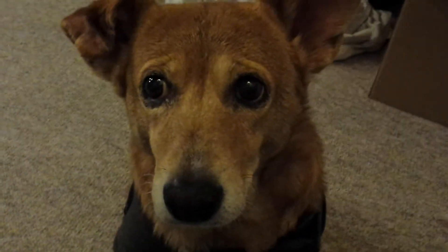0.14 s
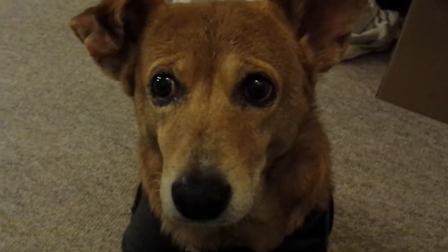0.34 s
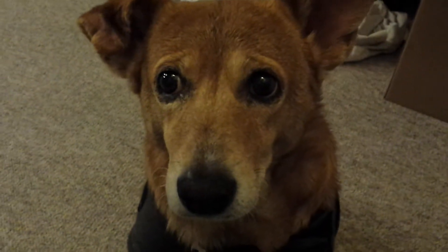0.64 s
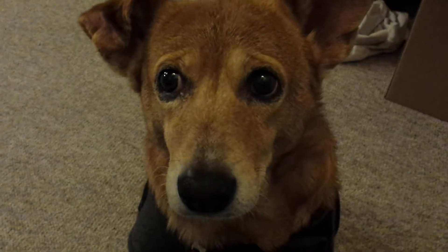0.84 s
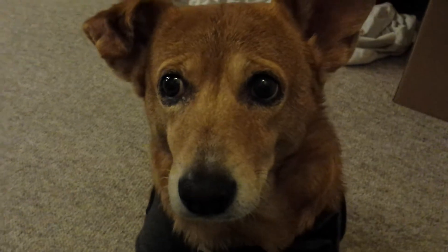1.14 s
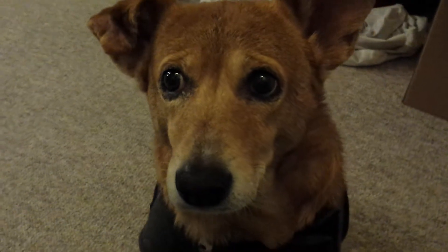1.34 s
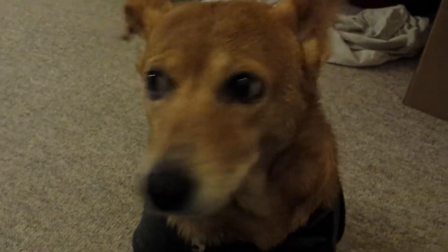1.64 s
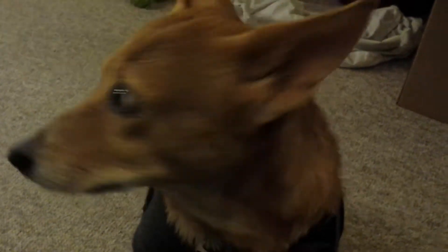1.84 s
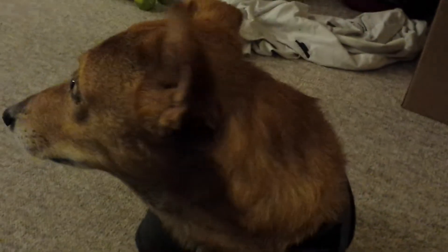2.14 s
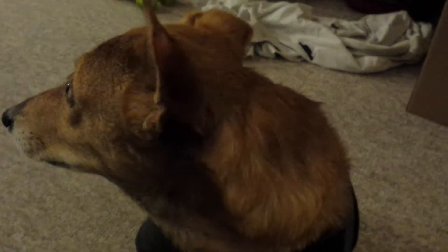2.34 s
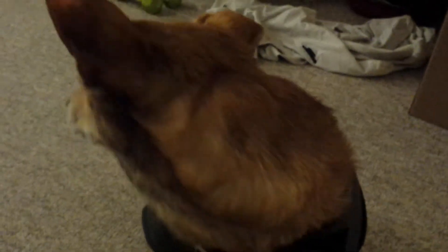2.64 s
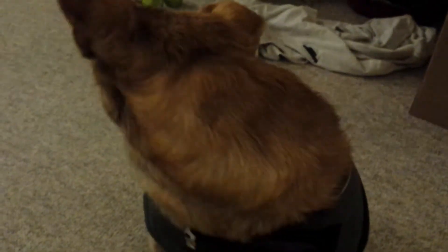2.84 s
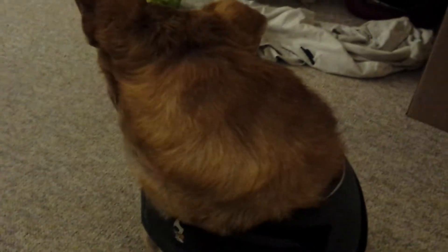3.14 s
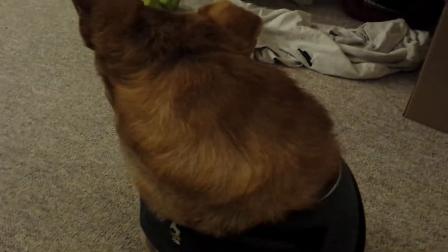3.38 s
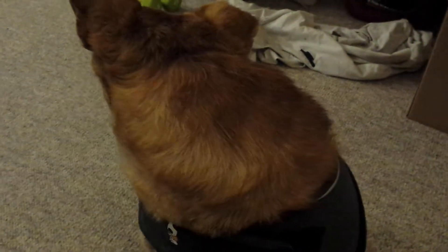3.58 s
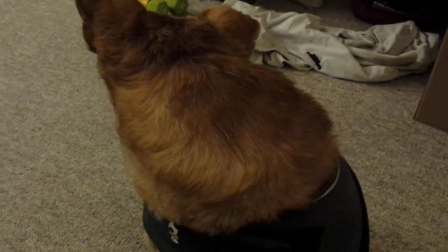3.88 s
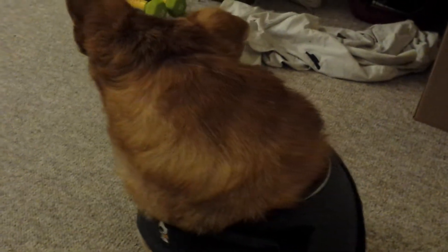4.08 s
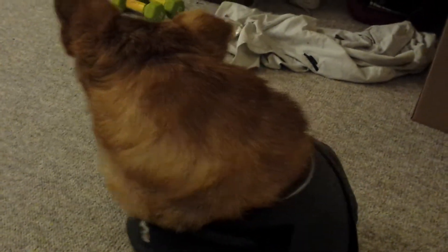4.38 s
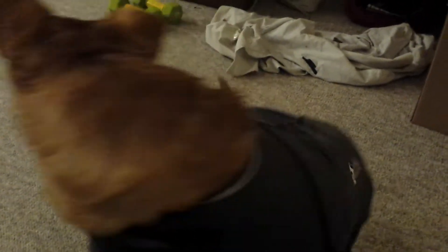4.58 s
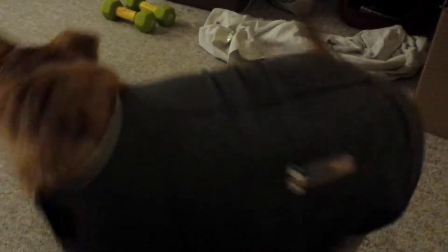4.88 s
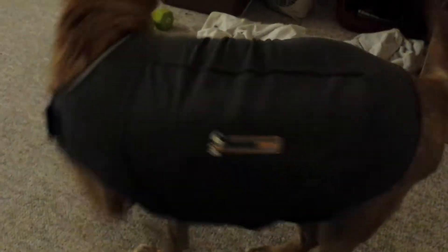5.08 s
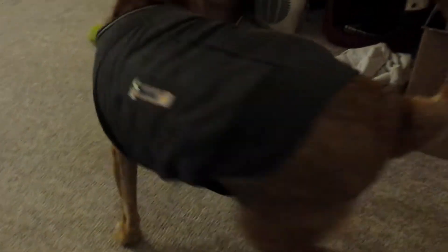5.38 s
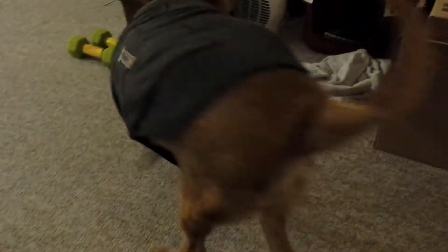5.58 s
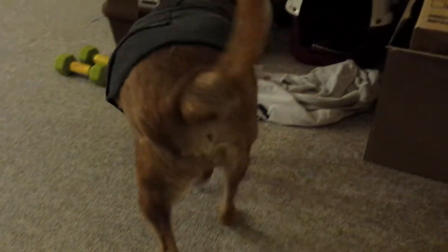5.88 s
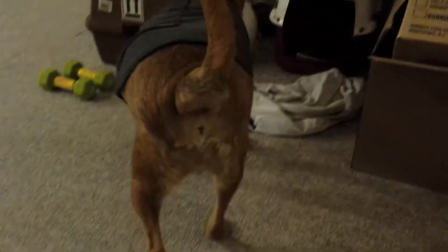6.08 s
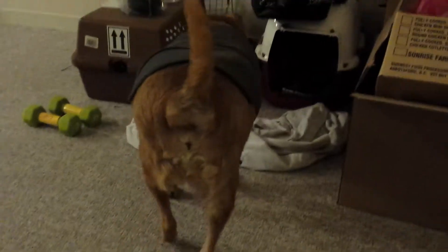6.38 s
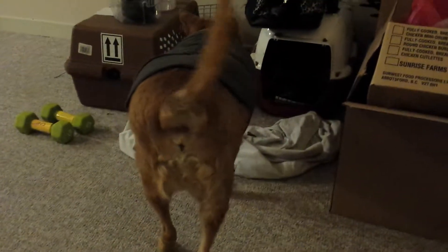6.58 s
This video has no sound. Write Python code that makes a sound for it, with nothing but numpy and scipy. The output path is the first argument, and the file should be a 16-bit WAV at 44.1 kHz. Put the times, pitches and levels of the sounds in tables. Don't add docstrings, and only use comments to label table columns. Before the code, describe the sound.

A dog in a fabric vest shifts and scuffs near the microphone, rises with soft thuds and ticking claws, then pads off into quiet.

```python
import sys
import numpy as np
from scipy import signal
from scipy.fft import rfft, irfft, next_fast_len
from scipy.io import wavfile
from scipy.ndimage import uniform_filter1d, map_coordinates

SR = 44100
rng = np.random.default_rng(int(sys.argv[2]) if len(sys.argv) > 2 else 0)


def gain_from_decibels(decibels):
    exponent = np.asarray(decibels, float) / 20
    return 10 ** exponent


def master(y):
    cut = np.clip(np.atleast_2d(y).T, -1, 1)
    pcm = np.round(cut * 32767)
    wavfile.write(sys.argv[1], SR, pcm.astype(np.int16))


N = 296352

# peak_s, level_db, rise_s, fall_s (per 20 dB), pressure_db
FIDGETS = [(0.028, -51, 0.073, 0.053, 2.5), (0.066, -55.5, 0.047, 0.074, 2.5), (0.151, -67, 0.17, 0.34, 6),
           (0.562, -58.5, 0.17, 0.64, 2), (0.666, -68.5, 0.19, 0.22, -16), (.744, -63, 0.57, .08, 7.5),
           (0.874, -56.5, 0.019, 0.32, -3), (1.029, -55.5, 0.13, 0.068, 4.5), (1.222, -56, 0.14, 0.14, 2),
           (1.384, -50, 0.2, 0.029, 1), (1.432, -50, 0.11, 0.1, 5), (1.48, -61.5, .05, 0.3, -4),
           (1.654, -76, 0.19, 0.041, 13.5), (1.769, -68, 0.052, 0.2, 4.5), (1.93, -68, 0.057, 0.35, 4),
           (2.06, -60.5, 0.27, 0.15, 3), (2.225, -74, 0.053, 0.037, 8), (2.456, -65, 0.041, 0.1, -5),
           (2.6, -67, 1, 1, 5), (2.948, -59.5, 0.53, 0.11, 2.5), (3.0, -54, 0.042, 0.11, 1),
           (3.045, -63.5, 0.054, 0.15, 5), (3.19, -55.5, 0.089, 0.11, -1),
           (3.229, -57.5, 0.097, 0.073, 3.5), (3.495, -60.5, 0.17, 0.19, 3)]
# peak_s, level_db, rise_s, fall_s (per 20 dB),
# pressure_db
STRIDES = [(3.85, -71.5, 0.94, 0.33, -2), (3.987, -63, 0.22, 0.17, 1.5), (4.213, -68, 0.48, 0.79, 3.5),
           (4.487, -61.5, 0.24, 0.078, 4.5), (4.512, -66, 0.025, 0.021, 22.5),
           (4.541, -63, 0.056, 0.1, -19), (4.651, -53.5, 0.084, 0.032, 12.5), (4.699, -58, 0.14, 0.13, 9),
           (4.805, -55.5, 0.17, 0.099, 7.5), (4.872, -50.5, 0.051, 0.011, 11.5),
           (4.889, -64.5, 0.03, 0.093, 18), (4.997, -56, 0.2, 0.12, -0.5), (5.125, -56.5, 0.12, 0.032, 5),
           (5.145, -56.5, 0.039, .1, 9), (5.192, -52.5, 0.062, 0.013, -13), (5.287, -50, 0.075, 0.078, 5),
           (5.34, -61.5, 0.11, 0.022, 16), (5.37, -64.5, 0.092, 0.47, 6.5), (5.418, -60, 0.044, 0.018, 10),
           (5.466, -59, 0.039, 0.027, 10), (5.53, -71, 0.14, 0.45, -10), (5.635, -51.5, 0.039, 0.065, 9.5),
           (5.67, -59.5, 0.039, 0.044, 3), (5.764, -62.5, 0.061, 0.14, 11.5),
           (5.862, -52.5, 0.026, 0.025, 5.5),
           (5.9, -70, 0.043, .2, 5.5),
    (5.99, -65, 0.23, 0.23, 4.5),
    (6.099, -68.5, 0.026, 0.087, 13),
    (6.473, -73, 0.078, 0.025, 9.5),
    (6.589, -72.5, 0.45, 0.073, 6.5),
    (6.7, -77.5, .15, 0.33, 1),
]
# freq_hz, density_db
CLOTH_SPECTRUM = [(2240, -25.5), (3800, -7.5), (4400, -6.5), (6290, -2), (7120, 1.5), (11000, -17.5),
                  (13400, -17.5), (14700, -36)]
FUR_SPECTRUM = [(900, -23), (1500, -8.5), (2300, -1), (3800, -2.5), (4600, -11.5), (7000, -24)]
PILE_SPECTRUM = [(350, -9.5), (600, -0.5), (900, 0.5), (1350, -0.5), (1900, -5), (3500, -31)]
# freq_hz, width_hz, level_db
BOARDS = [(105, 73, -2), (175, 100, 0.5), (250, 56, 1.5), (330, 68, -1.5), (384, 95, -0.5),
          (483, 182, -4.5), (656, 270, -12.5)]
# start_s, peak_db, low_board_hz, high_board_hz, high_share_db
SETTLES = [(.206, -58.5, 171, 366, -15.5), (.437, -56, 234, 314, -5), (.952, -56.5, 260, 399, -8),
           (1.318, -56.5, 206, 323, -10), (1.4, -54, 214, 330, -14), (1.445, -55.5, 274, 404, -7),
           (1.94, -60, 284, 369, -3), (2.407, -53, 262, 319, -4.5), (2.926, -50, 67, 433, -17),
           (3.173, -60.5, 272, 316, -16), (3.424, -47, 197, 316, -7), (3.436, -57.5, 240, 668, -5),
           (.22, -66, 262.5, 400, -8), (.975, -65, 303, 410, -18), (3.908, -61, 195, 291, 0.5),
           (4.119, -66.5, 216, 323, -16)]
# start_s, peak_db, low_board_hz, high_board_hz, high_share_db
STEPS = [(4.413, -50, 169, 311, -11), (4.425, -56.5, 201, 330, -14), (4.518, -64, 163, 364, -10),
         (4.625, -56.5, 300, 465, 2), (4.652, -46, 258, 470, -3.5), (4.672, -44.5, 242, 454, -13),
         (4.693, -41, 250, 467, -1.5), (4.763, -51.5, 280, 474, 2), (4.796, -45.5, 273, 476, -4.5),
         (4.812, -49.5, 317, 447, -6), (4.59, -60, 490, 300, -6), (4.826, -48, 265, 430, -8),
         (5.006, -52, 190, 330, -6), (5.118, -58, 280, 454, 0), (5.178, -54.5, 280, 466, -1.5),
         (5.408, -64, 244, 402, -9), (5.482, -66, 400, 480, 0), (5.65, -57, 250, 420, 0.5),
         (4.858, -59, 209, 430, -9), (4.953, -45.5, 113, 247, 8), (4.955, -34.5, 156, 294, -5.5),
         (4.991, -57, 181, 320, -8), (5.086, -41.5, 250, 468, -6.5), (5.144, -54, 284, 440, 1),
         (5.265, -59, 298, 446, -9), (5.358, -43, 266, 420, -10), (5.385, -48, 190, 314, -12),
         (5.469, -64, 117, 412, 5), (5.52, -49.5, 240, 403, -8), (5.638, -47, 187, 290, -3),
         (5.78, -68, 375, 253, -5), (5.911, -58.5, 186, 316, -14), (6.019, -63.5, 290, 318, -22),
         (6.105, -65.5, 112.5, 383, 1.5), (6.363, -61, 202, 368, -8)]
# start_s, peak_db, dull_part_db, dull_hz
SEAMS = [(0.1466, -59, 3, 2870), (0.6236, -37, -16.5, 2940), (0.7324, -40.5, -8, 2600),
         (0.8667, -46, -20, 2490), (1.3282, -41.5, -9, 2250), (1.349, -36.5, -3, 4810),
         (1.3714, -43, -10, 2690), (1.38, -32.5, -8, 3540), (1.766, -57, -10, 1006),
         (1.954, -43.5, -6.5, 3500), (2.0691, -46, -6, 990), (2.123, -54.5, 1, 3480),
         (2.443, -43, -9, 3570), (2.9017, -46, -2.5, 3460), (2.9372, -43, -7, 2560),
         (2.992, -49, 2.5, 2420), (3.168, -25.5, -14.5, 1985), (3.173, -37.5, -16, 1910),
         (3.405, -63.5, 2.5, 2610)]
# start_s, peak_db, dull_part_db, dull_hz
CLAWS = [(4.2027, -49.5, -8, 1810), (4.5091, -51, -6, 860), (4.7, -44, -3, 1290), (4.8845, -40, 1, 3060),
         (5.114, -35, -28, 805), (5.149, -38, -6, 935), (5.1788, -35.5, -15, 3400),
         (5.2667, -31.5, -13, 1100), (5.2784, -32.5, -6.5, 3080), (5.301, -40, -10, 2720),
         (5.4142, -47, -5, 2670), (5.4604, -52, -6, 810), (5.629, -53, -14, 736), (5.644, -50, -16, 888),
         (6.0951, -51, -17, 2000), (6.1863, -64.5, -0.5, 1404), (6.4099, -64, 1.5, 1514)]
# start_s, peak_db, pitch_hz
TAPS = [(4.586, -55, 1280), (4.629, -60, 1030), (4.645, -46, 2820), (4.651, -42, 1400), (4.694, -44, 1130),
        (4.764, -53, 719), (4.790, -47, 7000), (4.515, -57, 845), (5.856, -52, 7600), (4.851, -42, 1370),
        (4.871, -45, 3000), (4.957, -45, 6460), (4.994, -51, 888), (5.043, -44, 6790), (5.11, -54, 821),
        (5.114, -36, 6590), (5.122, -46, 830), (5.122, -48, 3300), (5.149, -37, 935), (5.179, -40, 7270),
        (5.253, -51, 6300), (5.267, -50, 1140), (5.279, -42, 6250), (5.284, -34, 6400), (5.29, -34, 6360),
        (5.3, -46, 1620), (5.339, -45.5, 775), (5.345, -50, 2000), (4.998, -62, 3000), (5.007, -48, 7000),
        (4.993, -48, 8000), (5.004, -48, 1520), (5.333, -46.5, 2700), (5.600, -51, 6970),
        (5.620, -46, 2000), (5.628, -46.5, 791), (5.647, -38, 4100), (5.664, -51, 1300), (5.760, -62, 2990),
        (5.783, -54.5, 1500), (5.634, -46, 6900), (5.655, -50, 3020), (5.672, -52, 7000),
        (6.110, -60, 1000), (6.225, -64, 3054), (6.421, -61.5, 1520), (6.470, -66, 6560),
        (6.471, -61.5, 1500), (6.541, -49, 6900), (6.541, -63, 3000), (6.098, -60, 2000)]
# start_s, peak_db, pitch_hz
FLICKS = [(1.161, -55, 6470), (1.2025, -45, 7070), (1.370, -43.5, 7220), (1.377, -40.5, 7200),
          (1.4253, -40, 7500), (1.912, -47, 6850), (2.069, -45.5, 3920), (2.223, -62, 4800),
          (2.669, -47, 6750), (2.844, -47.5, 6680), (3.090, -48, 4800), (3.405, -58, 3000),
          (3.234, -51, 2540), (3.778, -57.5, 3470), (3.908, -51, 5000), (3.168, -50, 8300),
          (3.170, -28.5, 6270), (3.172, -36.5, 1940), (2.075, -60, 950), (3.18, -42, 7000),
          (3.174, -42, 8000)]
# start_s, peak_db
CRACKS = [
    (4.8744, -42),
    (4.8845, -42),
    (4.889, -47.5),
    (5.1786, -45.5),
    (5.187, -49),
    (5.2664, -52),
    (4.2027, -52),
]
# time_s, level_db
CREAK = [(0, -56), (.06, -73), (.14, -70), (.22, -90), (.4, -110)]
# start_s, port_index, step_db, edge_hz
POPS = [
    (.58186, 0, -13.8, 15000),
    (.58277, 0, -5.1, 15000),
    (3.5371, 1, -4.7, 8000),
]
# freq_hz, left_minus_right_db
PORTS = [(100, 2), (290, 3), (640, -0.5), (1400, 4), (3070, 8), (6500, 4.5), (8200, -7), (14800, -4)]
# freq_hz, gain_db
FACING = [(1500, 0.5), (2500, 0), (8500, 1.5), (11500, 6), (14800, 6)]
# freq_hz, t60_s
ROOM = [(150, 0.44), (2000, 0.14), (10000, 0.016)]
# time_s, firing_hz, first_order_db, second_order_db
ENGINE = [
    [(.6, 74.6, -68, -75), (.8, 77, -67.5, -76), (.88, 80.6, -90, -74), (1.03, 80.6, -70, -69),
     (1.35, 89, -74.5, -87), (1.6, 92.3, -82.5, -80), (1.8, 99.4, -92, -72.5), (2, 103.3, -93, -84)],
    [(2.15, 107.7, -77, -101), (2.35, 115, -87, -87.5), (2.62, 120.7, -72, -99), (3, 126.5, -80, -83),
     (3.2, 127.5, -91.5, -82)],
    [(4.35, 107.8, -77, -99), (4.57, 107.6, -71, -100), (5.33, 108.5, -76, -104), (5.7, 109.5, -74.5, -101),
     (6.72, 108.2, -81, -89.5)],
]
# freq_hz, density_db
HUSH = [(12, -27.5), (20, -3.5), (49, -8.5), (118, -8.5), (257, -20), (330, -20), (487, -35.5), (699, -21),
        (1520, -29.5), (2650, -26.5), (4880, -27.5), (7000, -22.5), (10000, -27.5), (14000, -24),
        (15200, -43)]
# freq_hz, correlation
ALIKE = [(60, 0.092), (180, 0.66), (540, 0.087), (1630, 0.059), (4920, 0.024), (14800, 0.02)]


def unit(x):
    return x / np.sqrt(np.mean(x ** 2) + 1e-20)


def along(points, hz):
    f, v = np.transpose(points)
    return np.interp(np.log(hz + 1), np.log(f + 1), v)


def curves(rows):
    s, *cols = np.transpose(rows)
    return [np.interp(np.arange(N) / SR, s, c) for c in cols]


def wobble(rate_hz):
    return map_coordinates(rng.standard_normal(N // 20), [np.arange(N) * rate_hz / SR])


def filtered(x, response):
    m = next_fast_len(x.shape[-1] + SR // 4)
    spectrum = rfft(x, m) * response(np.fft.rfftfreq(m, 1 / SR))
    return irfft(spectrum, m)[..., :x.shape[-1]]


def peak(f, hz, width_hz):
    return 1j * f * width_hz / (hz * hz - f * f + 1j * f * width_hz)


def boards(f):
    return sum((-1) ** k * gain_from_decibels(db) * peak(f, hz, width_hz)
               for k, (hz, width_hz, db) in enumerate(BOARDS))


def paired(pair, gain):
    def split(hz):
        turn = np.arccos(np.clip(along(ALIKE, hz), -1, 1)) / 2
        return gain(hz) * [np.cos(turn), np.sin(turn)]

    mid, side = filtered(pair, split)
    return unit(np.array([mid + side, mid - side]))


def sides(pan_db):
    return gain_from_decibels(np.array([pan_db / 2, -pan_db / 2]))


def add_at(out, start_s, x):
    out[:, round(start_s * SR):][:, :x.shape[1]] += x


def strokes(press):
    t = np.arange(0, N, 32) / SR
    power = 1e-11
    for s, db, rise_s, fall_s, pressure_db in FIDGETS + STRIDES:
        away = np.where(t < s, (s - t) / rise_s, (t - s) / fall_s)
        power = power + gain_from_decibels(2 * (db + press * pressure_db - 20 * away ** 0.83))
    return np.interp(np.arange(N) / SR, t, np.sqrt(power))


def fibres(clump_db, snap_db):
    clumps = 1.2 * wobble(40) + wobble(150)
    snaps = np.minimum(rng.exponential(1, N // 8 + 1), 4).repeat(8)[:N]
    return gain_from_decibels(clump_db * clumps + snap_db * snaps) * rng.standard_normal((2, N))


def scuffs():
    cloth = paired(fibres(clump_db=1.0, snap_db=1.5), lambda hz: gain_from_decibels(along(CLOTH_SPECTRUM, hz)))
    fur = paired(fibres(clump_db=1.5, snap_db=1.1), lambda hz: gain_from_decibels(along(FUR_SPECTRUM, hz)))
    pile = paired(fibres(clump_db=1.5, snap_db=3.0), lambda hz: gain_from_decibels(along(PILE_SPECTRUM, hz)))
    weight = paired(fibres(clump_db=-1, snap_db=0.5), boards)
    out = gain_from_decibels(2.5) * strokes(0) * cloth
    out += gain_from_decibels(-5.5) * strokes(0.31) * fur
    out += gain_from_decibels(-11.5) * strokes(0.99) * pile
    return out + gain_from_decibels(-24) * strokes(0.35) ** 0.73 * weight


def paws():
    out, t = np.zeros((2, N + SR)), np.arange(SR // 5) / SR
    for rows, t60_s in ((SETTLES, 0.09), (STEPS, 0.069)):
        fall = gain_from_decibels(-60 * t / t60_s) * (1 - np.exp(-(t / 0.0047) ** 2))
        for s, db, low_hz, high_hz, high_db in rows:
            walk = rng.standard_normal((2, len(t))).cumsum(1)
            drift = 0.018 * uniform_filter1d(walk, size=200)
            low = np.sin(2 * np.pi * low_hz * t + drift[0])
            high = gain_from_decibels(high_db + 3.5) * np.sin(2 * np.pi * high_hz * t + 2 * drift[1])
            noise = rng.standard_normal((2, len(t)))
            shake = paired(noise, lambda f: boards(f) + 0.12 * peak(f, 700, 700))
            add_at(out, s, gain_from_decibels(db + 4.0) * ((low + high) * fall ** 1.02 + 0.5 * shake * fall))
    return out[:, :N]


def snags():
    out, t = np.zeros((2, N + SR)), np.arange(SR // 10) / SR
    for rows, spill_t60_s in ((SEAMS, 0.07), (CLAWS, 0.022)):
        for s, db, dull_db, dull_hz in rows:
            bright_hz = 6850 * (1 + 0.033 * rng.standard_normal())
            spill = gain_from_decibels(2.0 * rng.exponential(1, len(t)) - 60 * t / spill_t60_s)
            fall = gain_from_decibels(-60 * t / 0.0053) + 0.58 * spill
            burst = rng.standard_normal((2, 2, len(t))) * fall
            bright = filtered(burst[0], lambda f: peak(f, bright_hz, 2100) ** 2
                              + 0.17 * peak(f, 5600, 1500) ** 2 + 0.079 * peak(f, 7700, 3400) ** 2)
            dull = filtered(burst[1], lambda f: peak(f, dull_hz, 0.96 * dull_hz) ** 2)
            snap = bright / np.abs(bright.mean(0)).max()
            snap += gain_from_decibels(dull_db + 3.5) * dull / np.abs(dull.mean(0)).max()
            add_at(out, s, gain_from_decibels(db - 4.5) * snap)
    return out[:, :N]


def taps():
    out, t = np.zeros((2, N + SR)), np.arange(SR // 40) / SR
    for s, db, hz in TAPS + FLICKS:
        t60_s = 8.1 / hz + 0.0019
        fall = gain_from_decibels(-60 * t / t60_s)
        rise = 1 - np.exp(-(hz * t / 0.32) ** 2)
        grit = filtered(rng.standard_normal((2, len(t))) * fall, lambda f: peak(f, hz, 1.1 * hz) ** 2)
        ring = np.sin(2 * np.pi * hz * t) * fall * rise
        add_at(out, s, gain_from_decibels(db) * (ring + 0.4 * grit / np.abs(grit).max()))
    return out[:, :N]


def cracks():
    out, t = np.zeros((2, N + SR)), np.arange(SR // 200) / SR
    for s, db in CRACKS:
        burst = rng.standard_normal((2, len(t))) * gain_from_decibels(-60 * t / 0.0025)
        add_at(out, s, gain_from_decibels(db) * filtered(burst, lambda f: peak(f, 7000, 16000)))
    return out[:, :N]


def creak():
    noise = rng.standard_normal((2, N))
    return gain_from_decibels(curves(CREAK)[0]) * paired(noise, lambda f: peak(f, 449, 90) ** 2)


def pops():
    def bass_cut_step(f):
        return 1j * f / (96 ** 2 - f * f + 1j * f * 124) * 1j * f / (18 + 1j * f)

    out = np.zeros((2, N))
    for s, port, db, edge_hz in POPS:
        kick = gain_from_decibels(db) * SR / (2 * np.pi) * (np.arange(N) == round(s * SR))
        out[port] += filtered(kick, lambda f: bass_cut_step(f) / (1 + 1j * f / edge_hz) ** 2)
    return out


def room(x):
    hz, t, z = signal.stft(rng.standard_normal((2, SR // 3)), SR, nperseg=256)
    decay = gain_from_decibels(-60 * t / along(ROOM, hz)[:, None])
    tail = signal.istft(z * decay, SR, nperseg=256)[1]
    return signal.fftconvolve(x, tail / np.linalg.norm(tail[0]), axes=1)[:, :N]


def engine():
    out, t = np.zeros(N), np.arange(N) / SR
    for gear in ENGINE:
        hz, first_db, second_db = curves(gear)
        phase = 2 * np.pi * np.cumsum(hz * (1 + 0.0057 * wobble(23))) / SR
        start_s, end_s = gear[0][0], gear[-1][0] + 0.2
        on = np.clip(20 * np.minimum(t - start_s, end_s - t), 0, 1)
        orders = gain_from_decibels(first_db) * np.sin(phase) + gain_from_decibels(second_db) * np.sin(2 * phase)
        out += on * np.sqrt(2) * gain_from_decibels(1.6 * wobble(19)) * orders
    return out


def hush():
    air = paired(rng.standard_normal((2, N)), lambda hz: gain_from_decibels(along(HUSH, hz)))
    rumble = unit(filtered(rng.standard_normal((2, N)), lambda f: peak(f, 45, 50) ** 2))
    return gain_from_decibels(-72.5 + 0.71 * wobble(5.7)) * air + gain_from_decibels(-92.0 + 3 * wobble(5.6)) * rumble


def scene():
    turn_s, top_hz = 4.45, 14720
    thumps, ticks = paws(), snags()
    echo = room(gain_from_decibels(-15.0) * thumps + gain_from_decibels(-8.5) * ticks)
    dog = thumps + ticks + echo + scuffs() + creak() + taps()
    near = filtered(dog, lambda hz: sides(along(PORTS, hz)))
    up = round(turn_s * SR)
    near[0, up:] = filtered(near[0, up:], lambda hz: gain_from_decibels(along(FACING, hz)))
    airborne = near + engine() + hush()
    return filtered(airborne, lambda hz: hz < top_hz) + pops() + cracks()


def top_cut(x):
    return signal.sosfilt(signal.butter(12, 14760, fs=SR, output="sos"), x)


def record(dry):
    return top_cut(dry)


dry = scene()
out = record(dry)
master(out)
```